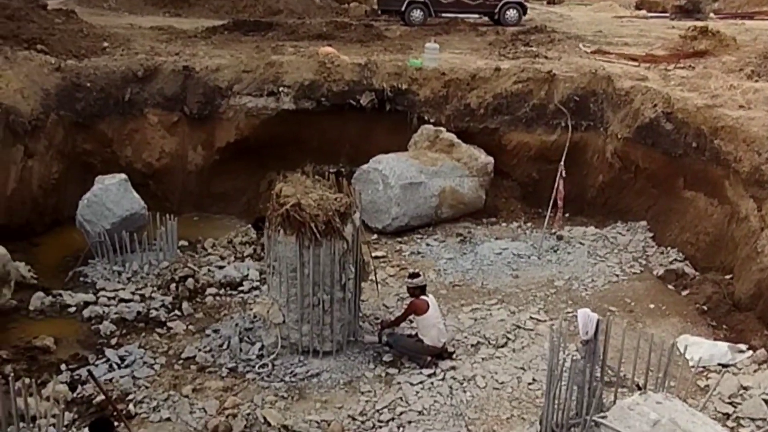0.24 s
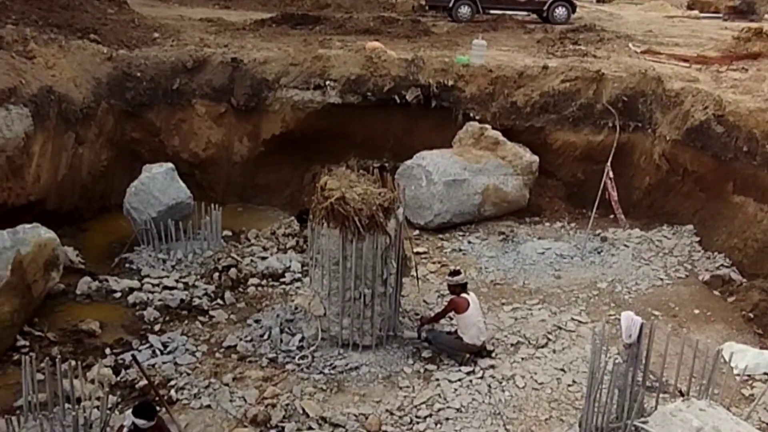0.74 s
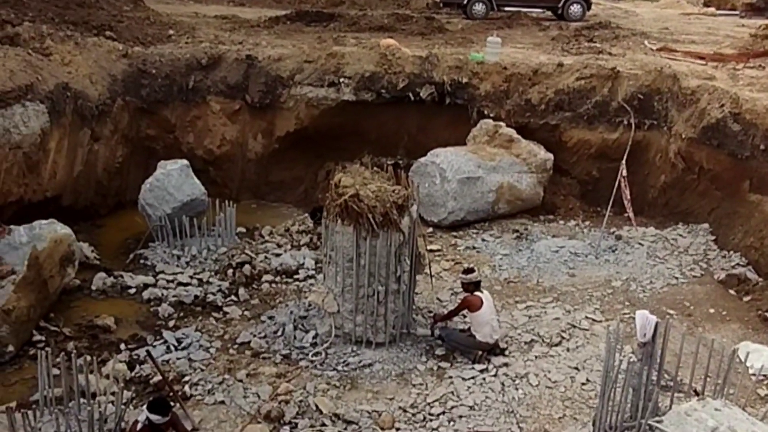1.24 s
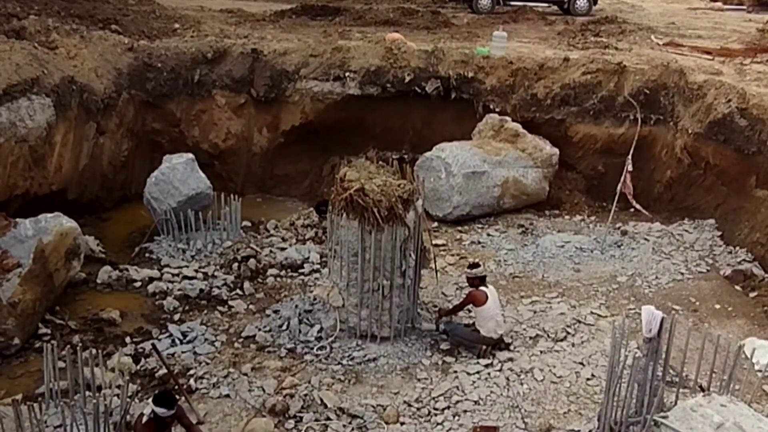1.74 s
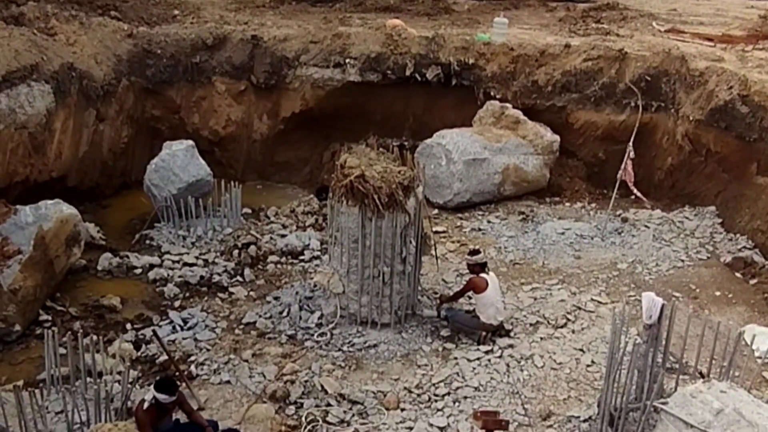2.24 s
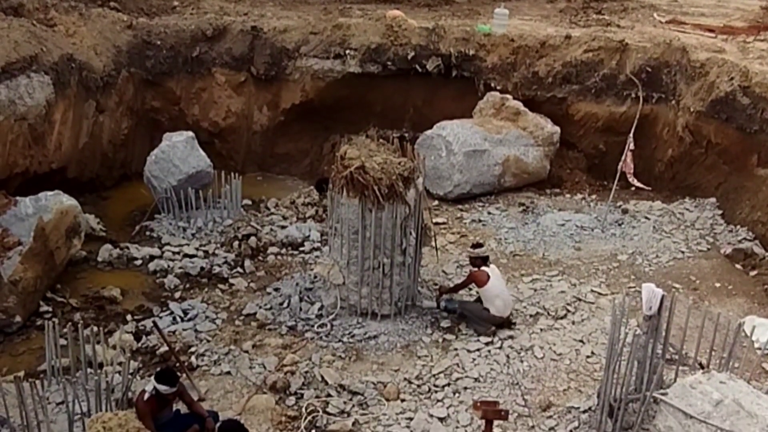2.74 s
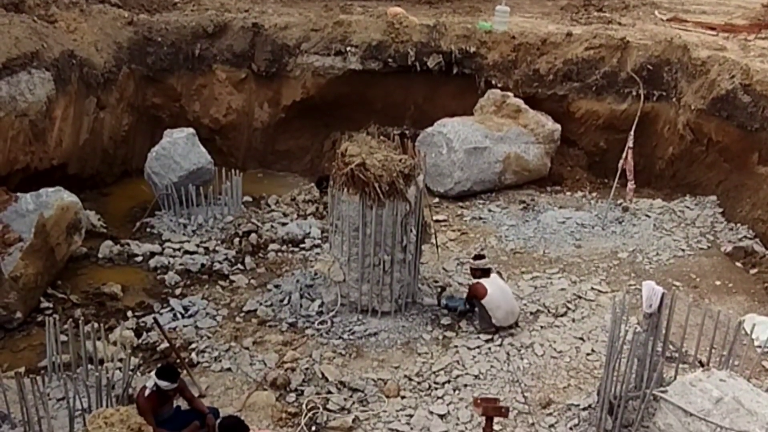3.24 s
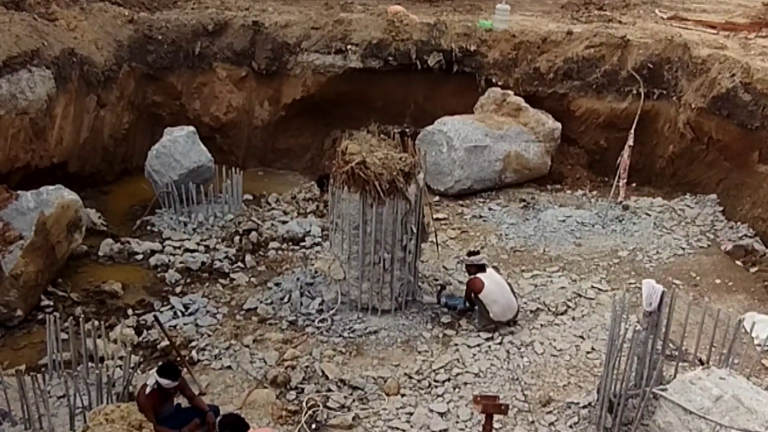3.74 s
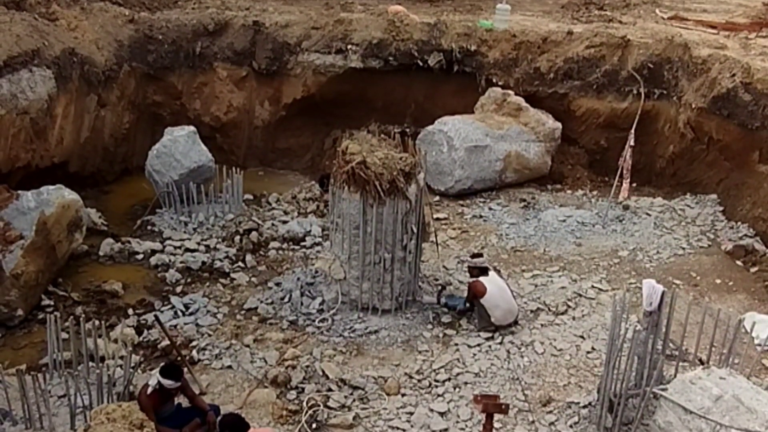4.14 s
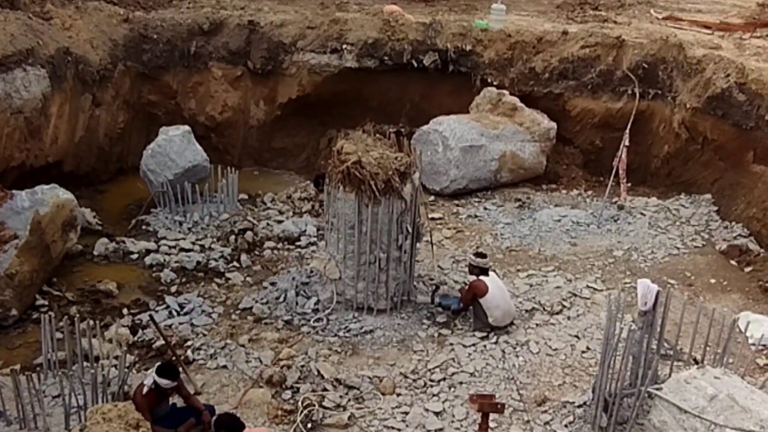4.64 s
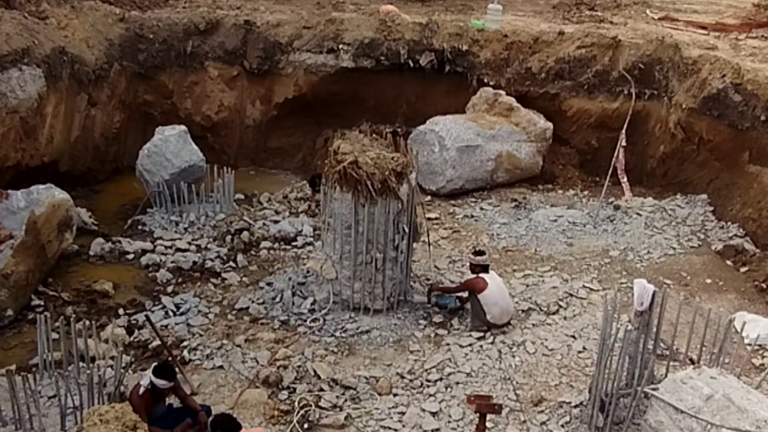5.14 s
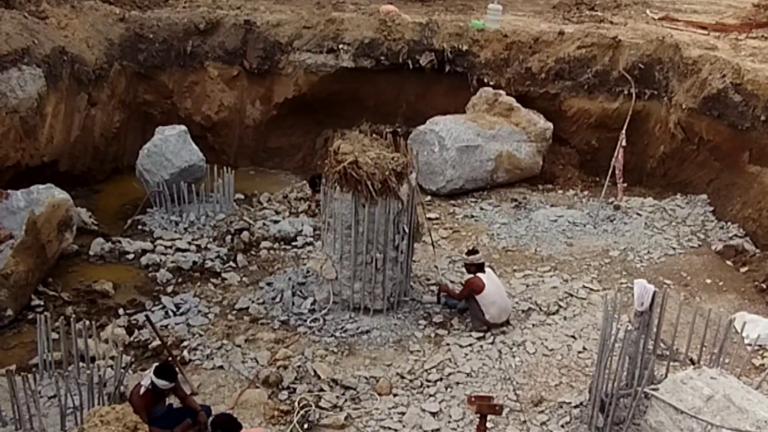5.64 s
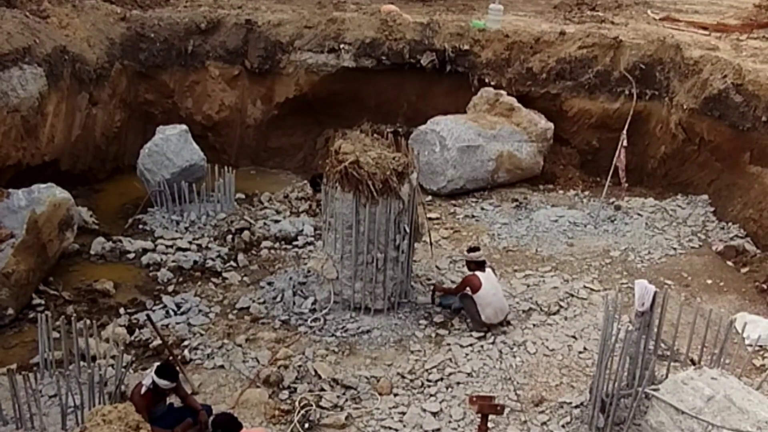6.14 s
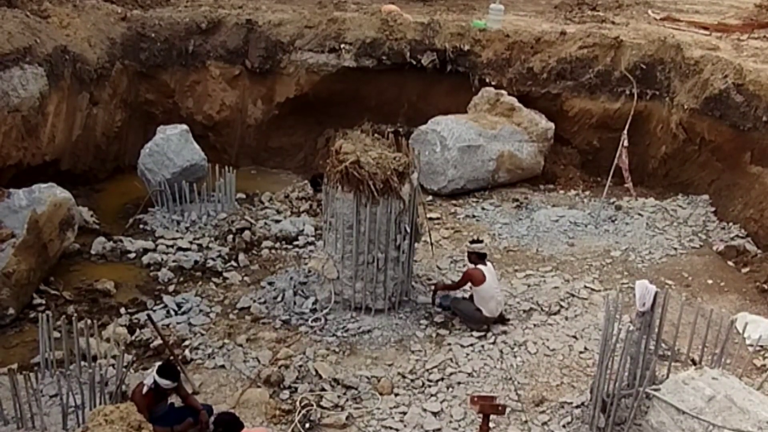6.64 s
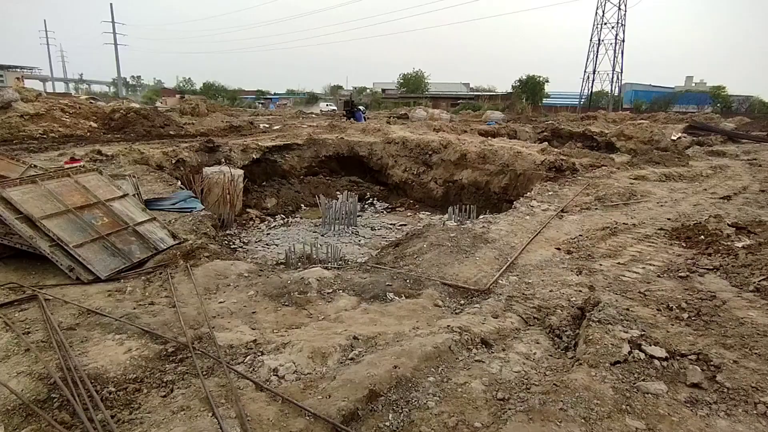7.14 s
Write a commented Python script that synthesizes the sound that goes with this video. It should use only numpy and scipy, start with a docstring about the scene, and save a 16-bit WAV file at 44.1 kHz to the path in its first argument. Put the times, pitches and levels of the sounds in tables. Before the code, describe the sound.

A pneumatic breaker hammers concrete in rapid ringing blows, then rattles and buzzes lightly as windy gusts buffet the microphone, before cutting to near silence.

```python
"""Hard blows with ringing steel, about twenty a second: a pneumatic breaker bites, heard from a windy pit's rim.
Each blow sums a pressure pulse, decaying modes, scattered noise, a ground reflection and diffuse echoes.
Then the tool runs light, buzzing and rattling in three bursts a stroke of noise and housing modes, until it
catches again. Air hisses as filtered noise that swells with the strokes; gusts buffet the microphone as
low-pitched noise. Near the end all falls almost silent for a moment, and only the wind comes back."""
import sys
import numpy as np
from scipy import signal
from scipy.fft import rfft, irfft
from scipy.io import wavfile

SR = 44100
rng = np.random.default_rng(int(sys.argv[2]) if len(sys.argv) > 2 else 0)


def output_pcm(signal):
    """Save a mono or channel-first signal as 16-bit PCM at the path in sys.argv[1].

    Samples are clipped to [-1, 1] before scaling.
    """
    pcm = np.clip(np.atleast_2d(signal).T, -1, 1) * 32767
    wavfile.write(sys.argv[1], SR, np.round(pcm).astype(np.int16))


N = 326340
TIME = np.arange(N) / SR

BITE_START_S, BITE_END_S, LIGHT_START_S = .032, 2.8, 2.965
SILENCE_START_S, SILENCE_END_S = 7.112, 7.378

# stroke rate while the chisel bites, sagging as it wedges: (time [s], rate [strokes/s])
BITING = [(0, 19.88), (.437, 20.335), (.68, 20.97), (1.8, 21.205), (2.053, 19.35), (2.427, 17.89),
          (2.9, 17.71)]
# stroke rate while the tool runs light: (time [s], rate [strokes/s])
LIGHT = [(3.2, 22.78), (3.6, 23.09), (3.9, 22.76), (4.17, 22.56), (4.45, 24.79), (4.75, 22.36),
         (4.9, 22.15), (5.05, 21.79), (5.3, 22.9), (5.55, 23.27), (5.85, 22.37), (6.1, 22.25), (6.4, 22.67),
         (6.7, 22.34)]
# course of the light running: (time [s], relative level [dB])
RATTLE = [(3.0, -23.5), (3.85, -20), (4.582, -20.5), (4.75, -24), (4.88, -21.5), (5.0, -19.5),
          (6.751, -16.5)]
# bursts within a light stroke: (share of the stroke [0-1], relative level [dB], Gaussian decay length [s])
BURSTS = [(0, 0, .008), (.27, -6, .009), (.665, -5.5, .007)]
# how freely the chisel rattles: (time [s], amplitude share [0-1])
LOOSENESS = [(2.9, 0.62), (3.15, 0.9), (6.72, 0.53), (6.84, 0.07)]


def from_db(db):
    """Level to amplitude: 20 dB is a factor of ten."""
    return 10 ** (np.asarray(db) / 20)


def rms_one(x):
    """Normalisation to unit mean power."""
    return x / np.sqrt(np.mean(x ** 2) + 1e-20)


def read(rows, at=TIME, axis=1):
    """Linear interpolation of one column of a curve at the given moments."""
    rows = np.array(rows)
    return np.interp(at, rows[:, 0], rows[:, axis])


def drift(rate_hz):
    """Random fluctuation of unit spread: white noise through two equal low-pass poles at the given rate."""
    step = 40  # samples between the computed values
    pole = np.exp(-2 * np.pi * rate_hz * step / SR)
    noise = rng.standard_normal(N // step + 2002)
    slow = signal.lfilter([1], [1, -2 * pole, pole * pole], noise)[2000:]
    return np.interp(np.arange(N) / step, np.arange(len(slow)), rms_one(slow))


def add(track, s, sound):
    """Superposition of a short stereo sound at a moment."""
    start = int(np.clip(s * SR, 0, N - 1))
    track[:, start:start + sound.shape[1]] += sound[:, :N - start]


def colour(x, spectrum, size=4096):
    """Minimum-phase filtering of each channel through the cepstrum, with unit power gain overall."""
    table = np.array(spectrum, float)
    hz = np.maximum(np.fft.rfftfreq(size, 1 / SR), 1)
    gain_db = [np.interp(np.log(hz), np.log(table[:, 0]), side) for side in table.T[1:]]
    cepstrum = irfft(np.log(rms_one(from_db(gain_db))))
    # folding the cepstrum onto positive time makes the response causal
    cepstrum[:, 1:size // 2] *= 2
    cepstrum[:, size // 2 + 1:] = 0
    response = irfft(np.exp(rfft(cepstrum)))
    return signal.oaconvolve(x, response, axes=1)[:, :N]


def scatter(size, apart):
    """Diffuse field at two ports: noise coherent at long wavelengths and less so at short ones."""
    mid, side = rng.standard_normal((2, size))
    side = apart * signal.lfilter(*signal.butter(1, 4000, "high", fs=SR), side)
    return rms_one(np.array([mid + side, mid - side]))


def evolve(noise, size, apart, alike=.85):
    """Partial correlation: new scattered noise that keeps much of the preceding one at equal power."""
    return alike * noise + np.sqrt(1 - alike ** 2) * scatter(size, apart)


def ring(modes, t, uneven_db=0.0):
    """Modal superposition: decaying sines whose strengths and phases may vary a little at each excitation."""
    phase_spread = .05  # cycles
    hz, mode_db, t60 = np.array(modes).T[:, :, None]
    strength = from_db(mode_db + uneven_db * rng.standard_normal(hz.shape) - 60 * t / t60)
    phase = hz * t + phase_spread * rng.standard_normal(hz.shape)
    return np.sum(strength * np.sin(2 * np.pi * phase), axis=0)


def strokes(pace, start_s):
    """Phase as integrated rate: how many strokes the piston has done at each moment."""
    return np.cumsum(read(pace) * (TIME >= start_s)) / SR


def moments(done, end_s, share=0):
    """Inversion of the phase: when each stroke reaches a given share of its cycle."""
    count = np.interp(end_s, TIME, done)
    return np.interp(np.arange(count) + share, done[done > 0], TIME[done > 0])


def wedged(s):
    """Clamping of the shank by the rock, which rises from 0 to 1 and then holds."""
    start_s, takes_s = 1.49, 1
    return np.clip((s - start_s) / takes_s, 0, 1)


def swell(s, left_db, right_db, length_s):
    """Gaussian envelope at each port, the form of a passing eddy."""
    bell = np.exp(-np.minimum(((TIME - s) / length_s) ** 2, 50))
    return from_db([[left_db], [right_db]]) * bell


def blows(times, levels_db):
    """Impact radiation: a pressure pulse excites body, shaft and tip; ground, rubble and pit return the sound."""
    # clang of the tip, shifting as it digs in: (time [s], frequency [Hz], relative level [dB])
    tip_curve = [(0, 4000, -0.5), (.35, 4220, 6.5), (.6, 4450, 3.5), (.8, 4900, -5), (.95, 5020, -1),
                 (1.42, 4970, 4.5), (1.62, 5260, -1), (1.8, 5300, -18), (2.15, 4140, 4), (2.7, 4560, -8.5),
                 (3.2, 4540, 7), (6.6, 4520, 7), (6.9, 5190, 4)]
    # lower clang of the shaft, strongest when it bites best: (time [s], frequency [Hz], relative level [dB])
    shaft_curve = [(0, 2450, -8.5), (.6, 2330, 9), (1.2, 2500, 20.5), (1.6, 2500, 20.5), (1.95, 2430, 11),
                   (2.35, 2490, 17), (2.8, 2420, -13)]
    # short modes of the tool body: (frequency [Hz], relative level [dB], T60 [s])
    body_modes = [(690, -16, 0.0076), (1372, 2, 0.018), (1476, -8, 0.093), (1620, 4.5, 0.018),
                  (1857, 14.5, 0.012), (2186, 15.5, 0.011), (3210, -1, 0.04)]
    # spectrum of a blow: (frequency [Hz], left relative level [dB], right relative level [dB])
    spectrum = [(275, -10.5, -31), (407, -28.5, -19), (564, -8.5, -15), (1030, -17.5, -18),
                (1483, -6.5, -5), (1860, -10, -4.5), (2610, -18.5, -14), (3160, -12.5, -25.5),
                (3913, -11, -1), (4970, -8.5, 5.5), (7900, -22, -26.5), (12200, -21, -36),
                (12600, -7.5, -18.5), (15400, -30, -15.5)]
    body_db, tip_db, shaft_db = -7, -5.0, -6
    knock_db, knock_s = -0.5, .0052
    ground_db, ground_lag_s = -14, .0031
    echo_db, echo_t60, tail_db, tail_t60 = -16, .045, -26, .16
    heavy_db = -14  # blows below this level crack and shake the tool less
    crack, free_s, wedged_s, thin_hz = 21, .00011, .000085, (300, 1000)
    clang_t60, clang_wander = .02, .01  # [s], relative spread of the frequency
    loose_start_s, loose_end_s = 3.0, 6.74
    dull = signal.butter(2, 6500, fs=SR)

    t = np.arange(SR // 12) / SR
    rise = 1 - np.exp(-t / .0004)
    knock = from_db(knock_db) * rise * np.exp(-(t / knock_s) ** 2)
    echo_decay = from_db(echo_db - 60 * t / echo_t60) + from_db(tail_db - 60 * t / tail_t60)
    echoes = rise ** 2 * echo_decay

    def clang(curve, db, s):
        """Damped sine: one mode whose frequency and level follow a curve from blow to blow."""
        hz = read(curve, s) * rng.normal(1, clang_wander)
        return from_db(db + read(curve, s, axis=2) - 60 * t / clang_t60) * np.sin(2 * np.pi * hz * t)

    out, rubble = np.zeros((2, N)), scatter(len(t), 0.89)
    for s, level_db in zip(times, levels_db):
        # only a heavy blow cracks and shakes the whole tool; a light one mostly clangs the tip
        heavy = from_db(min(level_db - heavy_db, 0))
        # a wedged chisel cracks shorter and thinner
        front = t / np.interp(wedged(s), [0, 1], [free_s, wedged_s]) - 2
        shock = crack * front * np.exp(-front ** 2 / 2)
        thin = signal.butter(2, np.interp(wedged(s), [0, 1], thin_hz), "high", fs=SR)
        tip = clang(tip_curve, tip_db, s)
        shaft = clang(shaft_curve, shaft_db, s)
        body = from_db(body_db) * ring(body_modes, t, uneven_db=4)
        direct = np.sqrt(heavy) * shock / 2 + rise * (tip + heavy * (shaft + body))
        bounce = from_db(ground_db) * np.interp(t - ground_lag_s, t, direct, left=0)
        # the rubble scatters each blow much like the one before
        rubble = evolve(rubble, len(t), 0.33)
        returned = bounce + knock * rubble + echoes * scatter(len(t), 0.37)
        blow = from_db(level_db) * signal.lfilter(*thin, direct + returned)
        if loose_start_s < s < loose_end_s:
            blow = signal.lfilter(*dull, blow)
        add(out, s - .0002, blow)
    return colour(out, spectrum)


def chips(times, snaps_db):
    """Brittle fracture: just after impact the rock splits under the tip with a dry, bright noise burst."""
    # spectrum of the snap: (frequency [Hz], left relative level [dB], right relative level [dB])
    spectrum = [(1500, -27.5, -27), (3600, -7.5, -2), (6300, 1.5, 3), (8300, -25, -19.5),
                (12140, -8.5, -12), (13000, 3.5, -12.5), (15600, -2, -1.5)]
    delay_s, rise_s, decay_s, uneven_db = .00044, .00019, .0041, 1.5
    t = np.arange(SR // 40) / SR
    burst = (1 - np.exp(-t / rise_s)) * np.exp(-t / decay_s)
    out = np.zeros((2, N))
    for s, snap_db in zip(times, snaps_db):
        level = from_db(snap_db + uneven_db * rng.standard_normal())
        add(out, s + delay_s, level * burst * scatter(len(t), 1.0))
    return colour(out, spectrum)


def steel(times, levels_db):
    """Resonance: every blow renews the shank's long modes, which the rock's grip later damps."""
    # long modes of the steel: (frequency [Hz], relative level [dB], T60 [s])
    modes = [(732, -9, .25), (834, -9, .3), (902, -10, .3), (1213, 0, .4), (1492, -1, .35), (1625, -3, .2),
             (1938, -3, .14)]
    ring_db, damping_db = -20.5, 14
    grip_lag_s = .4  # the ring outlasts the first wedging
    wander_rad, wander_hz = 2.1, 4.9  # spread and rate of the phase drift
    pushes = np.zeros(N)
    pushes[(times * SR).astype(int)] = from_db(levels_db + ring_db - damping_db * wedged(times - grip_lag_s))
    out = np.zeros(N)
    for hz, db, t60 in modes:
        decay_per_sample = from_db(-60 / (t60 * SR))
        strength = signal.lfilter([1], [1, -decay_per_sample], pushes + 1e-18)
        out += from_db(db) * strength * np.sin(2 * np.pi * hz * TIME + wander_rad * drift(wander_hz))
    return out


def thuds(times):
    """Low-frequency pulse radiation: the cylinder thuds with a blow and again when its exhaust port opens."""
    # thud of the cylinder, higher as the tool labours: (time [s], frequency [Hz], relative level [dB])
    tone = [(0, 277, -29), (2.0, 298, -33.5), (2.45, 344, -29), (2.95, 336, -24.5)]
    port_opens_s, blow_db, right_db = .01303, -2, -3.5
    thud_s = .0039  # both the delay of the bell's peak and its half-width
    t = np.arange(-SR // 100, SR // 60) / SR
    bell = np.exp(-(t / thud_s - 1) ** 2) * from_db([[0], [right_db]])
    out = np.zeros((2, N))
    for s in times:
        thud = from_db(read(tone, s, axis=2)) * bell * np.sin(2 * np.pi * read(tone, s) * t)
        add(out, s + t[0], from_db(blow_db) * thud)
        add(out, s + t[0] + port_opens_s, thud)
    return out


def rattle():
    """Repeated loose contact: each light stroke gives a strong burst and two weaker rebounds over a wash of air."""
    # spectrum of the chatter: (frequency [Hz], left relative level [dB], right relative level [dB])
    spectrum = [(450, -24, -19.5), (880, -6, -4), (990, -19.5, -8), (1720, -15, -10.5), (1930, -16, -2),
                (2300, -19, -7), (3500, -19, -15), (4770, -42, 0), (6040, -41.5, -7), (6500, -17.5, -13.5),
                (8600, -42, -27), (15500, -23, -20)]
    rattle_db, wash_db, uneven_db, rise_s = -3.0, -11.5, 4.95, .00094
    t = np.arange(SR // 40) / SR
    bursts = np.zeros((2, N))
    for share, burst_db, length_s in BURSTS:
        burst = (1 - np.exp(-t / rise_s)) * np.exp(-(t / length_s) ** 2)
        clatter = scatter(len(t), 0.94)
        for s in moments(strokes(LIGHT, LIGHT_START_S), SILENCE_START_S, share):
            # each burst sounds much like that of the stroke before
            clatter = evolve(clatter, len(t), 0.74)
            level = from_db(burst_db + uneven_db * np.clip(rng.standard_normal(), -2, 1))
            add(bursts, s, level * burst * clatter)
    bursts = signal.lfilter(*signal.butter(2, 7000, fs=SR), bursts)
    running = read(LOOSENESS)
    wash = from_db(wash_db) * scatter(N, 0.97)
    chatter = colour(running * (bursts + wash), spectrum)
    return from_db(rattle_db + read(RATTLE)) * rms_one(chatter) * np.sqrt(np.mean(running ** 2))


def buzz():
    """Periodic excitation: running light, the piston knocks on the housing so evenly that it buzzes."""
    # modes of the housing: (frequency [Hz], relative level [dB], T60 [s])
    modes = [(590, -1, .018), (680, -1, .02), (765, -3, .022), (836, -5, .033), (903, -7, .03)]
    buzz_db, rebound_db, right_db, jitter_s = -14, -3, -1, .00026
    clicks = np.zeros(N)
    for share, _, _ in BURSTS:
        knocks = moments(strokes(LIGHT, LIGHT_START_S), SILENCE_START_S, share)
        at = ((knocks + jitter_s * rng.standard_normal(len(knocks))) * SR).astype(int)
        clicks[at] = from_db(rebound_db * (share > 0) + rng.standard_normal(len(at)))
    clicks = clicks * from_db(buzz_db + read(RATTLE)) * read(LOOSENESS)
    hum = signal.oaconvolve(clicks, ring(modes, np.arange(SR // 8) / SR))[:N]
    return hum * from_db([[0], [right_db]])


def exhaust():
    """Turbulent flow noise: spent air hisses round the pit and, while biting, swells with every stroke."""
    # exhaust air, loud while the tool works under load: (time [s], relative level [dB])
    air = [(0, -25.5), (2.3, -25), (3.3, -28), (4.7, -31.5), (6.7, -29), (6.9, -25)]
    # spectrum of the hiss: (frequency [Hz], left relative level [dB], right relative level [dB])
    spectrum = [(285, -5, -5.5), (418, -11.5, -15.5), (633, -2, -11.5), (955, -11.5, -15.5), (1400, -7, -6),
                (1790, -12, -6.5), (2250, -7.5, -2), (3590, -10, -20), (4320, -8.5, -1.5),
                (6050, -13.5, -19.5), (8770, -28.5, -32.5), (15600, -15.5, -38)]
    air_db, flutter_db, flutter_hz, puff_db = -2.5, 3.5, 100, 1.5
    puff = puff_db * np.cos(2 * np.pi * (strokes(BITING, BITE_START_S) - .1)) * (TIME < BITE_END_S)
    level_db = air_db + read(air) + puff + flutter_db * drift(flutter_hz)
    return colour(from_db(level_db) * scatter(N, 0.93), spectrum)


def jet():
    """Amplitude modulation of jet noise: the valve's thin hiss follows each stroke, most deeply running light."""
    # air escaping through the valve over one stroke: (share of the stroke [0-1], relative level [dB])
    valve = [(0, -3), (.2, 1.5), (.34, 3.3), (.6, -2.5), (.72, .7), (.9, -4.5), (1, -3)]
    # course of the jet: (time [s], relative level [dB])
    jet_level = [(0, -39), (2.8, -37.5), (3.2, -32), (4.3, -37), (5.6, -32), (6.9, -32)]
    # spectrum of the jet: (frequency [Hz], left relative level [dB], right relative level [dB])
    spectrum = [(5050, -28.5, -31), (9600, -2, -6.5), (10720, -31.5, -31), (12040, 3.5, -8),
                (14000, 0.5, 6.5), (15200, -1, 0)]
    biting_share, flutter_db, flutter_hz = .35, 3.5, 13
    biting_db = biting_share * read(valve, strokes(BITING, BITE_START_S) % 1)
    light_db = read(valve, strokes(LIGHT, LIGHT_START_S) % 1)
    opening_db = np.where(TIME < BITE_END_S, biting_db, light_db)
    level_db = read(jet_level) + opening_db + flutter_db * drift(flutter_hz)
    return colour(from_db(level_db) * scatter(N, 1.0), spectrum)


def wind():
    """Turbulent pressure: eddies hit each port separately; strong gusts add a higher, ragged buffeting."""
    # breeze that freshens, then drops: (time [s], left relative level [dB], right relative level [dB])
    breeze_curve = [(0, -34, -40), (2.1, -29.5, -42), (2.45, -22.5, -35), (3.2, -29.5, -35),
                    (3.75, -28.5, -33), (4.1, -25, -26.5), (4.75, -17.5, -17), (5.3, -24.5, -25.5),
                    (5.65, -24, -15.5), (6.35, -25, -25), (6.8, -22.5, -25.5), (7.05, -30.5, -32),
                    (7.4, -21, -37)]
    # strong gusts: (time [s], left relative level [dB], right relative level [dB], Gaussian half-width [s])
    gusts = [(0.118, -24, -44, 0.083), (0.694, -26, -42, 0.046), (0.853, -34, -27, 0.024),
             (1.317, -22, -45.5, 0.027), (1.596, -24.5, -48, 0.026), (1.987, -20.5, -46, 0.078),
             (2.29, -20.5, -33, 0.045), (2.466, -18, -46, 0.044), (2.556, -11.5, -40, 0.021),
             (2.736, -22, -31, 0.052), (3.017, -32, -19, 0.06), (3.315, -22, -33, 0.021),
             (3.486, -23, -28, 0.024), (3.81, -22.5, -21.5, 0.071), (3.931, -10.5, -39, 0.034),
             (4.001, -36, -8, 0.014), (4.1, -13, -13.5, 0.067), (4.286, -8.5, -22, 0.038),
             (4.389, -11.5, -19, 0.037), (4.444, -13.5, -9.5, 0.044), (4.54, -19, -24, 0.054),
             (4.655, -12, -18, 0.053), (4.73, -30, -6.5, 0.021), (4.833, -9.5, -16, 0.022),
             (4.96, -31, -18.5, 0.052), (5.074, -16.5, -15, 0.053), (5.255, -13, -25, 0.041),
             (5.379, -24, -15.5, 0.016), (5.585, -18, -16, 0.045), (5.678, -15, -15, 0.036),
             (5.812, -27, -25.5, 0.056), (5.935, -30, -24, .04), (6.125, -11.5, -14, 0.056),
             (6.244, -31, -8.5, 0.028), (6.303, -25, -27, 0.029), (6.567, -8.5, -29, 0.028),
             (6.67, -12, -22, 0.043), (6.772, -8.5, -22, 0.031), (6.843, -19, -15, 0.053)]
    # single eddies that thump the microphone: (time [s], left relative level [dB], right relative level [dB])
    thumps = [(0.077, -12, -39), (0.161, -16, -41.5), (2.501, -9, -40), (2.983, -29, -4.5),
              (3.925, -4, -34), (4.087, -1.5, -25), (4.422, -15, -16), (4.61, -11, -20), (4.68, -9, -20),
              (4.736, -17.5, -7), (4.825, -8, -14), (4.859, -6, -13), (5.882, -5.5, -24), (6.441, -3, -26),
              (6.536, -5.5, -24), (6.6, -10, -24), (6.655, -15, -2.5), (6.764, -7, -23), (6.81, -15, -7.5)]
    # spectrum of the rumble: (frequency [Hz], left relative level [dB], right relative level [dB])
    rumble_spectrum = [(15, 2.5, -7), (35.4, 6, 7.5), (77, 4.5, 1.5), (134, -3, -0.5), (245, -10.5, -18),
                       (400, -45, -54.5), (930, -42.5, -43), (3000, -68, -66)]
    # spectrum of the buffeting: (frequency [Hz], left relative level [dB], right relative level [dB])
    buffet_spectrum = [(20, -27.5, -12), (68, -0.5, -11.5), (147, 4, -3), (281, -5, -5.5),
                       (507, -19.5, -23.5), (800, -34.5, -38.5), (3030, -33, -50), (9000, -56.5, -49)]
    swell_db, swell_hz, thump_s = 1.5, 10, .0035
    lumpy_db, ragged_db = 1.5, 4.0
    strong_db, steepness, buffet_db = -20, 1.19, -7.5  # buffeting grows faster than the wind itself
    breeze = from_db([read(breeze_curve, axis=port) + swell_db * drift(swell_hz) for port in (1, 2)])
    gust_db = 20 * np.log10(np.hypot(breeze, sum(swell(*gust) for gust in gusts)))
    eddies = np.array([drift(38), drift(52)])
    rumble = rms_one(colour(rng.standard_normal((2, N)) * from_db(lumpy_db * eddies), rumble_spectrum))
    buffet = rms_one(colour(rng.standard_normal((2, N)) * from_db(ragged_db * eddies), buffet_spectrum))
    force = from_db(strong_db + steepness * (gust_db - strong_db) + buffet_db)
    force = force + sum(swell(*thump, thump_s) for thump in thumps)
    return from_db(gust_db) * rumble + force * buffet


def scene():
    """Superposition: the breaker bites, taps and catches in the wind; after the silence only the wind returns."""
    # force of the regular biting blows: (time [s], relative level [dB])
    force = [(0, -15.5), (.43, -18), (.62, -15.5), (1.0, -17), (1.24, -18.5), (1.55, -16), (2.0, -17),
             (2.62, -18), (2.83, -19)]
    # how sharply the rock splits under the regular biting blows: (time [s], relative level [dB])
    snap = [(0, -21), (.2, -14), (.35, -12), (.5, -28), (.8, -16), (1.25, -18), (1.45, -13.5), (1.7, -15),
            (2.1, -21), (2.35, -17), (2.6, -21), (2.77, -21)]
    # the last two biting blows, then single blows where the chisel catches:
    # (time [s], relative level [dB], snap of the rock [dB])
    late_blows = np.array([(2.8266, -5.5, -11.5), (2.8815, -9.5, -13.5), (2.944, -11.5, -10),
                           (3.0143, -10, -27), (3.053, -13, -35), (3.0972, -9, -17), (3.1386, -9, -30),
                           (3.1912, -11.5, -29), (3.3015, -10, -29), (3.84, -11, -27), (3.926, -11, -26),
                           (4.0574, -9, -30), (4.191, -10.5, -31), (4.2743, -10.5, -25), (4.524, -12, -30),
                           (4.6533, -12, -31), (5.235, -9.5, -22), (5.283, -12, -32), (5.8475, -12, -30),
                           (5.939, -22, -26), (6.07, -14.5, -24.5), (6.559, -14.5, -32),
                           (6.7725, -8.5, -16), (6.8512, -8.5, -11), (6.9178, -12, -16),
                           (6.9823, -7.5, -14.5), (7.0325, -8.5, -17), (7.0917, -13, -16)])
    bite_db, late_db, tap_db, uneven_db = 0.5, -11.0, -10.0, 0.3
    tap_lead_s = .002  # a loose tip touches just before the first burst
    late_times = late_blows[:, 0]
    bites = moments(strokes(BITING, BITE_START_S), BITE_END_S)
    # running light, the tip taps once in every stroke in which the chisel does not catch
    taps = moments(strokes(LIGHT, LIGHT_START_S), RATTLE[-1][0]) - tap_lead_s
    taps = taps[np.abs(taps[:, None] - late_times).min(axis=1) > .025]
    times = np.r_[bites + rng.normal(0, .0001, len(bites)), taps, late_times]
    levels_db = np.r_[read(force, bites) + bite_db, read(RATTLE, taps) + tap_db, late_blows[:, 1] + late_db]
    levels_db = levels_db + uneven_db * rng.standard_normal(len(times))

    breaker = blows(times, levels_db) + steel(times, levels_db)
    breaker = breaker + chips(np.r_[bites, late_times], np.r_[read(snap, bites), late_blows[:, 2]])
    breaker = breaker + thuds(np.r_[bites, late_times[late_times < LIGHT_START_S]])
    breaker = breaker + rattle() + buzz() + exhaust() + jet()

    before = np.clip((SILENCE_START_S - TIME) / .006, 0, 1)
    after = np.clip((TIME - SILENCE_END_S) / .012, 0, 1)
    faint = from_db(-59.5)  # wind left during the silence
    return before * breaker + (before + after + faint) * wind()


def record(dry):
    """Soft saturation rounds the peaks, and a steep low-pass cuts the top of the band."""
    top, cutoff_hz = .92, 15900
    low_pass = signal.ellip(10, .2, 90, cutoff_hz, fs=SR, output="sos")
    return signal.sosfilt(low_pass, top * np.tanh(dry / top))


dry = scene()
out = record(dry)
output_pcm(out)
```